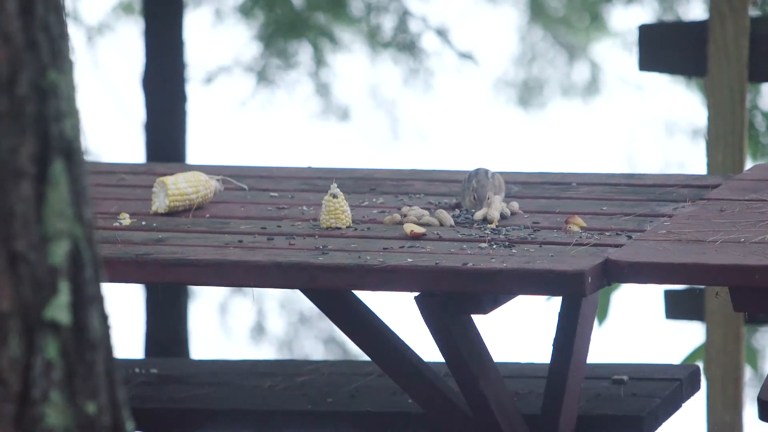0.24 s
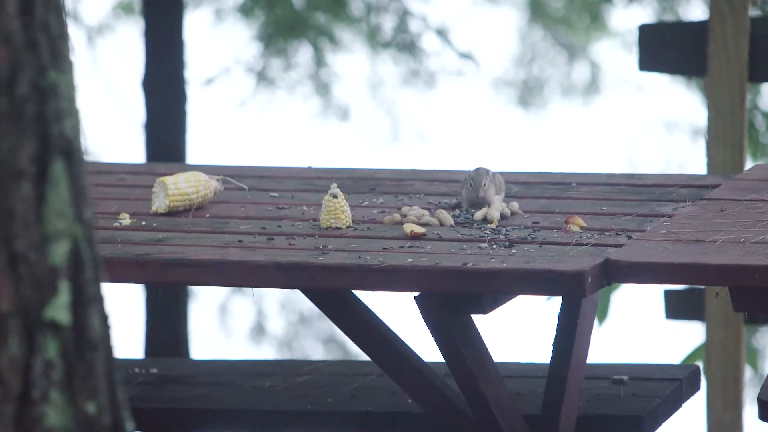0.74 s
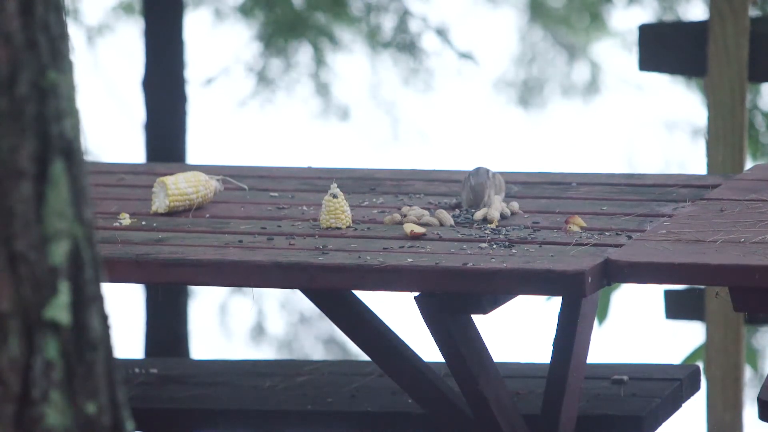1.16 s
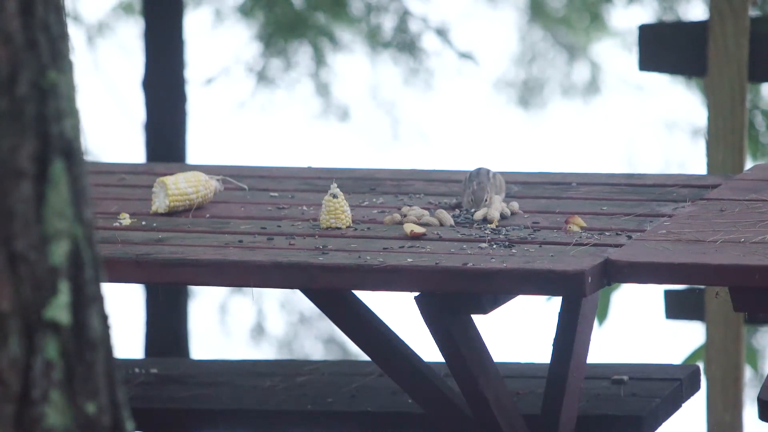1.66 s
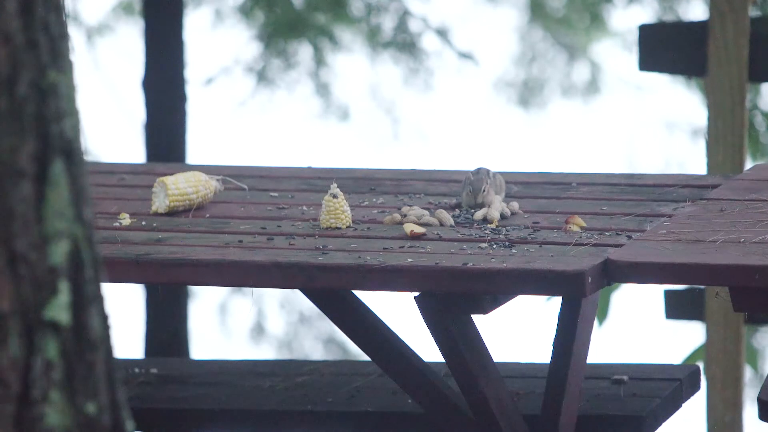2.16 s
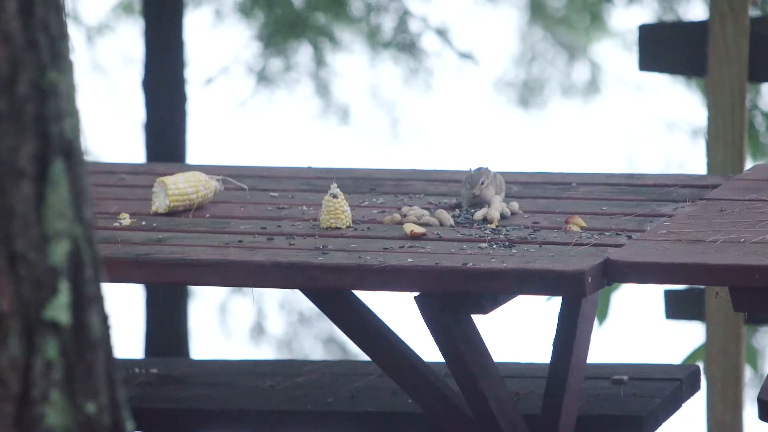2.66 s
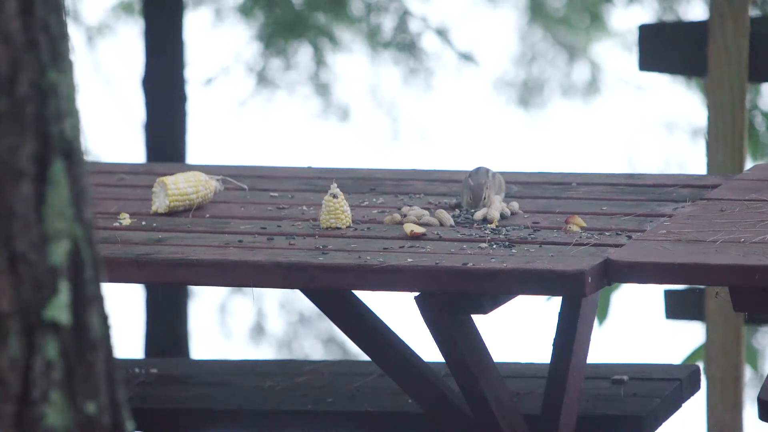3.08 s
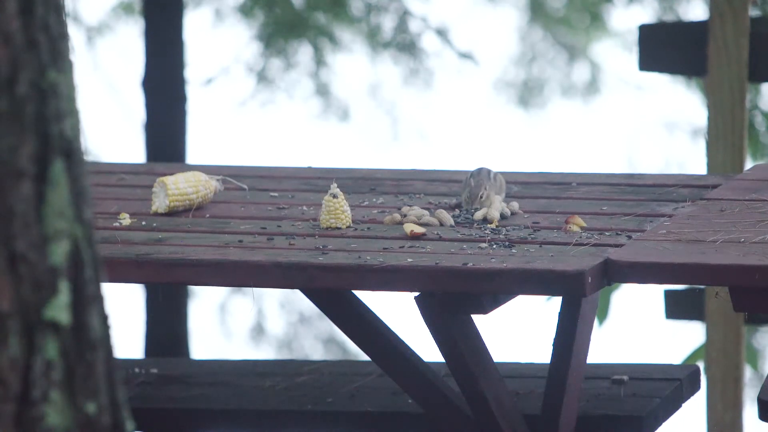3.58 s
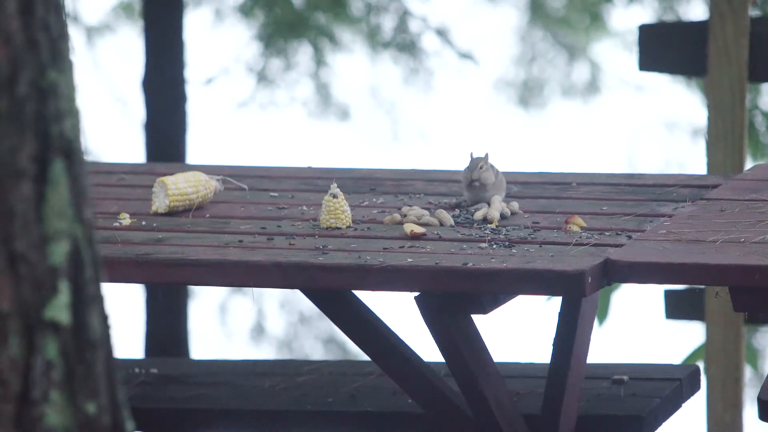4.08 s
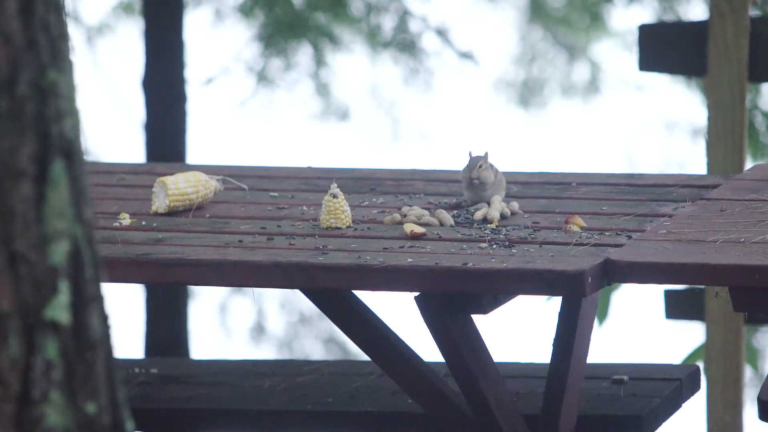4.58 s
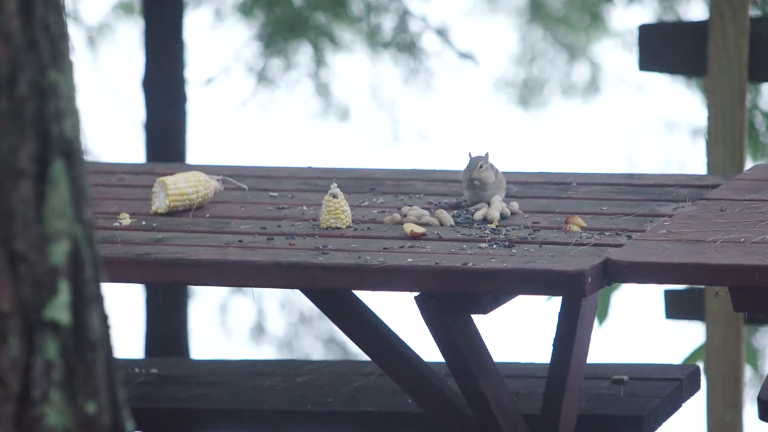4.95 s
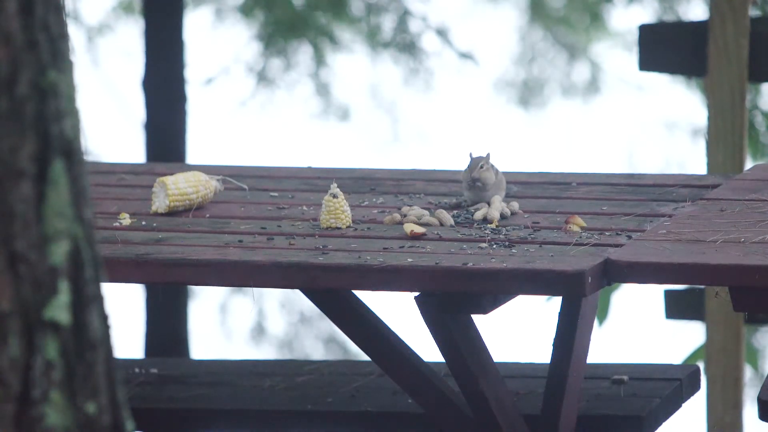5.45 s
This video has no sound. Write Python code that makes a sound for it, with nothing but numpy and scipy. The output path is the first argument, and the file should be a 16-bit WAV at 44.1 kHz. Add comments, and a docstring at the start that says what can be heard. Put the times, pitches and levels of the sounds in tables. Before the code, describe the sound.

A chipmunk gives short, sharp, high chips at an uneven pace outdoors, with low wind bumps, small wooden drips and soft hiss.

```python
"""A chipmunk chips unevenly among trees around a picnic table, from the start almost to the end; each chip
is a quick whistled arch with an echo tail. Early on, husk ticks, drips on wood and faint far calls join in.
A small bird scolds near 1.2, 2.8 and 4.3 s, each time with a whistle and then a rasp of chopped noise.
Gusts of shaped noise come and go over a light breeze, strongest near 3 s; a soft hiss runs throughout.
Late on comes a run of faint rising bird notes, and the last ticks and drips close the scene."""
import sys
import numpy as np
from scipy import signal
from scipy.fft import rfft, irfft
from scipy.io import wavfile
from scipy.ndimage import uniform_filter1d

SR = 44100
rng = np.random.default_rng(int(sys.argv[2]) if len(sys.argv) > 2 else 0)


def dump_mix(stems):
    """Bounce the given channels to the path in sys.argv[1] as a 16-bit WAV at rate SR."""
    frames = np.atleast_2d(stems).T  # one column per channel
    limited = np.clip(frames, -1, 1)  # hard clip at full scale
    pcm = np.round(limited * 32767).astype(np.int16)
    wavfile.write(sys.argv[1], SR, pcm)


N = 252252  # length of the scene in samples

# Levels in the event tables are those before scene() mixes the layers.
# Left-right values above zero make the left side louder.

# The chipmunk's chips: (time [s], length [s], top pitch [Hz], rise time [s], level [dB], left-right [dB],
# voice breaks to a lower note [yes/no])
CHIP_CALLS = [(.117, 0.018, 6770, 0.0027, -50, 14, True), (0.522, 0.049, 6310, .0024, -47, 3, False),
              (.744, 0.039, 6310, .0025, -42, 15, False), (1.396, 0.03, 6090, 0.0019, -55, 0, False),
              (1.692, 0.058, 6308, 0.00383, -48, -1, False), (1.955, .06, 6520, .0095, -47.3, -5, False),
              (2.244, .047, 6120, .0095, -52, 6, False), (2.527, .036, 6340, 0.0039, -48.5, 16, False),
              (2.788, 0.028, 6349, 0.00348, -46, 1.5, False), (2.966, 0.037, 6710, 0.0041, -47.5, 3, False),
              (3.158, 0.0206, 6740, .0025, -50.5, 5, True), (3.359, .036, 6990, .0044, -53, 3, True),
              (3.577, .054, 6780, .0045, -51.5, 5, False), (3.836, .03, 7025, .004, -45.5, 7, False),
              (4.533, .025, 5990, .0015, -50.5, -8, False), (4.657, 0.056, 6040, 0.00464, -58.5, 2, False),
              (4.886, .059, 6484, .0045, -55, 4, False), (5.268, 0.025, 6842, 0.0042, -47, 13, False),
              (5.539, .027, 6750, .0048, -51, 4, True)]
# The lower note after a break: how much of the chip passes first, and its level above that chip
BREAK_SHARE, BREAK_HZ, BREAK_LENGTH_S, BREAK_RISE_S, BREAK_EXTRA_DB = 0.62, 6180, 0.027, 0.001, 2

# The bird's scolds: (time [s], whistle length [s], top pitch [Hz], whistle level [dB], rasp length [s],
# rasp level [dB], grace note leads [yes/no])
BIRD_SCOLDS = [(1.196, .039, 5094, -46, .046, -44.5, True), (2.786, .033, 4535, -46.5, 0.057, -45, True),
               (4.253, .033, 4767, -47.5, 0.055, -45.5, False)]
# The low grace note, which starts just before the whistle
GRACE_LEAD_S, GRACE_LENGTH_S, GRACE_HZ, GRACE_DB = 0.0046, 0.0134, 3348, -57
RASP_GAP_S = 0.009  # pause between whistle and rasp
# Colour of the rasp with the throat open: (frequency [Hz], relative level [dB per Hz])
OPEN_THROAT = [(600, -12), (1000, 3.5), (1450, 6), (2250, -8), (3050, 4), (3750, -5), (4450, 6.5),
               (5600, -2.5), (6900, -12), (8200, -18), (9100, -10), (10100, -10), (11750, 6), (13200, -11),
               (15800, -15)]
# Colour of the rasp as the throat narrows: (frequency [Hz], relative level [dB per Hz])
NARROW_THROAT = [(600, -25), (1500, -12.5), (2300, -17.5), (2750, 4.5), (3050, 6), (3600, -7.5), (4450, -9),
                 (5500, 6), (6900, -9.5), (8700, -5), (10300, -8.5), (11900, -9), (13200, -19),
                 (15800, -12)]

# Answers from far off: (time [s], length [s], top pitch [Hz], level [dB])
FAR_ANSWERS = [(0.886, .22, 7600, -85), (.925, .04, 5570, -82), (1.136, .032, 5577, -76.5),
               (3.295, .023, 5688, -72.5), (3.5, 0.0325, 5735, -73.5), (4.083, .029, 5700, -76.5),
               (5.104, 0.0273, 5620, -74)]
# Short falling notes of distant birds: (time [s])
FALLING_NOTE_TIMES = [.333, 0.941, 1.158, 3.313, 3.72, 4.74, 5.255]
# A rising note is sung once alone, and later in an even run
LONE_RISE_S, RUN_START_S, RUN_STEP_S = 2.138, 4.765, 0.078

# Drips on wood: (time [s], ring level [dB], pitch [Hz], ring time to fall 60 dB [s],
# splash level over the ring [dB], splash time to fall 60 dB [s], left-right [dB])
WOOD_DRIPS = [(.163, -39, 440, 0.046, -16, .03, -11), (.547, -50.5, 380, 0.06, -11.5, .03, -15.5),
              (1.134, -53, 396, 0.074, -17, .03, -6), (1.284, -51, 437, 0.053, -14.5, .03, 1),
              (2.737, -33, 362.5, 0.12, -21, .015, -16), (3.133, -32, 423, 0.043, -12, 0.0115, -12),
              (3.353, -45.5, 1154, 0.053, 1, 0.095, -9), (5.589, -42, 515, 0.037, -4, 0.061, -7),
              (5.610, -46.5, 670, 0.0404, -10, .04, -7)]
# Ways the wood vibrates: (multiple of the drip's pitch [ratio], level [dB])
WOOD_MODES = [(1.002, 1.5), (1.27, -14), (1.45, -44), (2.3, -31)]
# The sharpest husk ticks: (time [s], peak level [dB], centre frequency [Hz])
HUSK_TICKS = [(.136, -45, 9760), (.171, -46, 2240), (.378, -52, 10040), (2.374, -51, 1950),
              (3.056, -48, 10820), (3.976, -52, 4900), (4.648, -50, 4150), (5.395, -48, 1500),
              (5.404, -52, 4000), (5.575, -46, 2700), (5.603, -46.5, 3200)]
# Fainter ticks get a random time and a random frequency in this range
CRUMB_DB, CRUMB_LOW_HZ, CRUMB_HIGH_HZ = -57, 3500, 10500

# How long the far echo of the trees rings: (frequency [Hz], time to fall 60 dB [s])
TREE_RING = [(300, 0.45), (1500, 0.287), (3000, 0.69), (6000, 0.585), (12000, 0.47)]
# How alike the echo is on both sides: (frequency [Hz], likeness [0-1])
ECHO_LIKENESS = [(300, 1), (3000, 0.82), (5500, 0.87), (6500, 0.47), (9000, 0.2), (15000, 0)]

# Light breeze at the microphone, before wind() raises it: (time [s], level [dB])
BREEZE_LEVEL = [(0.0, -67), (1.26, -57), (1.51, -66), (2.05, -59), (2.23, -50), (2.72, -51), (2.95, -37.5),
                (3.18, -43.5), (3.35, -52.5), (4.46, -75.5), (4.81, -66), (5.72, -62)]
# Gusts on top of the breeze: (time of peak [s], length [s], level [dB], left-right [dB])
WIND_GUSTS = [(0.258, 0.087, -42, 20), (.63, 0.064, -43, 2), (0.739, 0.0564, -30, 19),
              (1.096, 0.086, -31.5, 12), (1.394, 0.092, -39.5, 7), (1.744, .08, -47, 3),
              (2.052, 0.065, -40, 17), (2.423, 0.13, -40, -1), (2.72, 0.042, -36.5, 20),
              (2.791, 0.034, -24.5, 25.5), (3.014, 0.078, -27, 20), (3.169, 0.15, -31, 10),
              (3.352, 0.051, -36, 2), (3.628, 0.17, -45, -2), (5.39, 0.16, -49, 3.5)]
# Colour of the slow eddies: (frequency [Hz], relative level [dB per Hz])
SLOW_EDDY_COLOUR = [(8, -11), (18, -0.5), (30, 5), (46, -1), (65, -13), (100, -20.5), (170, -52),
                    (400, -69)]
# Colour of the finer eddies: (frequency [Hz], relative level [dB per Hz])
FINE_EDDY_COLOUR = [(30, -9), (55, 1.5), (85, -0.5), (130, -12), (190, -34), (400, -65)]
# At this wind level the fine eddies have this level; they gain this many dB per dB of wind
FINE_AT_WIND_DB, FINE_DB, FINE_GROWTH = -27, -47, 1.5

# Colour of the outdoor hiss: (frequency [Hz], relative level [dB per Hz])
HISS_COLOUR = [(18, 0), (30, 0.5), (126, 0), (243, -7.5), (420, -13), (492, -12.5), (606, -13),
               (996, -13.5), (2550, -21.5), (3070, -20), (4540, -24.5), (5590, -24.5), (6210, -26.5),
               (6890, -27.5), (15500, -37)]
# How alike the hiss is on both sides: (frequency [Hz], likeness [0-1])
HISS_LIKENESS = [(60, 0.84), (180, 0.343), (550, 0.41), (1650, 0.451), (4970, 0.6), (15000, 0.035)]
# Which side of the hiss is louder: (frequency [Hz], left-right [dB])
HISS_LEAN = [(60, -3), (180, -3.5), (550, -1.5), (1650, -1), (4970, -1), (15000, -1)]
HISS_DB = -56

# The microphone ports resonate differently in the treble: (frequency [Hz], lead of the left [radians])
PORT_LEAD = [(1000, 0), (5000, 0.57), (5700, 0.9), (6100, 2), (6500, 3), (7100, 2), (7800, 2),
             (10000, -0.6), (12500, 1.66)]
TOP_EDGE_HZ = 15800  # nearly everything above this is removed


def chips():
    """The chipmunk: one whistled arch per chip, with a second, lower one where the voice breaks."""
    notes = [row[:-1] for row in CHIP_CALLS]
    for s, length, _, _, db, pan_db, breaks in CHIP_CALLS:
        if breaks:
            break_s = s + BREAK_SHARE * length
            notes.append((break_s, BREAK_LENGTH_S, BREAK_HZ, BREAK_RISE_S, db + BREAK_EXTRA_DB, pan_db))
    return arches(notes, sag=0.35, fall_s=0.0036, jitter=0.006, octave_db=-16, slope_db=-13.5,
                  flutter_db=2.7, swell_db=2.5, under_db=-19)


def arches(notes, sag, fall_s, jitter, octave_db, slope_db, flutter_db, swell_db=0, under_db=-60,
           usual_s=0.045):
    """Whistles that leap to their pitch, hold it on one swelling push of air, and drop as it ends."""
    out = np.zeros((2, N))
    for s, length, hz, rise_s, db, pan_db in notes:
        t = np.arange(int(length * SR)) / SR
        # slack is large at both ends of the note and small in between
        slack = np.exp(-t / rise_s) + np.exp((t - length) / fall_s)
        # a longer call starts and ends lower
        depth = min(sag * length / usual_s, 0.6)
        pitch = hz * (1 - depth * slack) * (1 + jitter * wander(len(t), 350))
        phase = 2 * np.pi * np.cumsum(pitch) / SR

        # the slopes are weaker than the crest
        push_db = slope_db * slack + swell_db * t / length + flutter_db * wander(len(t), 160)
        push = signal.windows.tukey(len(t), 0.2) * amp(push_db)

        # the octave is a little hoarse, and the throat damps it on the highest notes
        hoarseness = 0.35 * wander(len(t), 1700)
        octave = amp(octave_db) * (1 + slack) * np.sin(2 * phase + hoarseness)
        octave = octave / (1 + (pitch / 6750) ** 24)
        # a faint tone an octave below shows as the voice slackens
        under = amp(under_db) * np.sqrt(slack) * np.sin(phase / 2)

        voice = push * (np.sin(phase) + octave + under)
        add(out, s, amp(db) * evened(voice), pan_db)
    return out


def whistles(rise_share=0.15, grace_rise_s=0.0017, pan_db=-4):
    """The whistled arch that opens each scold, sometimes led by a low grace note."""
    notes = []
    for s, length, hz, db, _, _, graced in BIRD_SCOLDS:
        notes.append((s, length, hz, rise_share * length, db, pan_db))
        if graced:
            notes.append((s - GRACE_LEAD_S, GRACE_LENGTH_S, GRACE_HZ, grace_rise_s, GRACE_DB, 0))
    return arches(notes, sag=0.36, fall_s=0.00322, jitter=0.0082, octave_db=-27, slope_db=-13,
                  flutter_db=3, swell_db=3)


def rasps(flutter_hz=155, pulse_share=0.31, leak=0.64, fade_db=4, low_rise_s=0.0068, narrowing_s=0.028,
          uneven_db=0.5):
    """Uneven slaps of the bird's syrinx (voice organ) chop a hiss, coloured by a throat that narrows."""
    out = np.zeros((2, N))
    low_pass = signal.butter(2, 4000, fs=SR, output="sos")
    for start, whistle_s, _, _, length, db, _ in BIRD_SCOLDS:
        s = start + whistle_s + RASP_GAP_S
        t = np.arange(int(length * SR)) / SR
        # each whole turn is one slap; its puff dies away until the next
        turns = np.cumsum(flutter_hz * (1 + 0.2 * wander(len(t), 170))) / SR
        puff_strength = leak + np.exp(-(turns % 1) / pulse_share)
        puffs = puff_strength * rng.standard_normal(len(t))
        level_db = uneven_db * wander(len(t), 600) - fade_db * t / length
        puffs = puffs * signal.windows.tukey(len(t), 0.34) * amp(level_db)

        openness = np.exp(-(t / narrowing_s) ** 2)
        voice = openness * coloured(puffs, OPEN_THROAT) + (1 - openness) * coloured(puffs, NARROW_THROAT)
        # the low part is held back at first, then swells in
        low = signal.sosfiltfilt(low_pass, voice)
        voice = voice - low * np.exp(-(t / low_rise_s) ** 2)
        add(out, s, amp(db) * voice, pan_db=1.5)
    return out


def answers(rise_s=0.003, pan_db=5):
    """Thin, flatter whistled arches from far off to the left."""
    notes = [(s, length, hz, rise_s, db, pan_db) for s, length, hz, db in FAR_ANSWERS]
    return arches(notes, sag=0.17, fall_s=0.0033, jitter=0.0063, octave_db=-20, slope_db=-15,
                  flutter_db=1.0)


def slurs(count=5):
    """Distant birds: faint pure tones that glide straight down or up."""
    out = np.zeros((2, N))
    rise_times = [LONE_RISE_S, *(RUN_START_S + RUN_STEP_S * np.arange(count))]
    # (length [s], from [Hz], to [Hz], level [dB])
    fall_note = (0.011, 3500, 2700, -72)
    rise_note = (0.022, 3300, 4400, -72.5)
    for times, (length, from_hz, to_hz, db) in (FALLING_NOTE_TIMES, fall_note), (rise_times, rise_note):
        pitch = np.linspace(from_hz, to_hz, int(length * SR))
        tone = np.sin(2 * np.pi * np.cumsum(pitch) / SR)
        note = amp(db) * evened(tone * signal.windows.tukey(len(pitch), 0.6))
        for s in times:
            add(out, s, note)
    return out


def drips():
    """A soft blow makes the wood ring in several fading tones, with a short noise splash on top."""
    out = np.zeros((2, N))
    t = np.arange(SR // 4) / SR
    soft_start = 1 - np.exp(-t / 0.001)
    for s, db, hz, t60, splash_db, splash_t60, pan_db in WOOD_DRIPS:
        ring = np.zeros(len(t))
        for multiple, mode_db in WOOD_MODES:
            ring += amp(mode_db - 60 * t / t60) * np.sin(2 * np.pi * hz * multiple * t)
        add(out, s, amp(db) * ring * soft_start, pan_db)
        splash = snap(1420, t60=splash_t60, octaves=0.44)
        add(out, s, amp(db + splash_db) * splash, pan_db)
    return out


def ticks(count=5):
    """Dry noise snaps of seed husks: a few sharp ones, and faint ones at random."""
    out = np.zeros((2, N))
    crumbs = []
    for when, height in rng.random((count, 2)):
        hz = CRUMB_LOW_HZ * (CRUMB_HIGH_HZ / CRUMB_LOW_HZ) ** height
        crumbs.append((when * N / SR, CRUMB_DB, hz))
    for s, db, hz in HUSK_TICKS + crumbs:
        add(out, s, amp(db) * snap(hz, t60=0.01, octaves=0.4))
    return out


def snap(hz, t60, octaves):
    """A tiny fading burst of noise, filtered to a band around one frequency, with peak 1."""
    t = np.arange(2048) / SR
    edges = np.clip([hz / 2 ** octaves, hz * 2 ** octaves], 50, SR / 2 - 100)
    band = signal.butter(2, edges, "band", fs=SR, output="sos")
    burst = signal.sosfilt(band, rng.standard_normal(len(t)) * amp(-60 * t / t60))
    return burst / abs(burst).max()


def trees(x, near_db, far_db, near_t60=0.34, same_side=0.18):
    """Nearby trunks and boards scatter a quick echo; the wood beyond adds a longer tail."""
    t = np.arange(SR) / SR
    # sparse random reflections, about 4000 a second
    a, b = rfft(rng.standard_normal((2, SR)) * (rng.random((2, SR)) < 4000 / SR))
    taps = irfft(alike_pair(a, b, np.clip(read(ECHO_LIKENESS, np.fft.rfftfreq(SR, 1 / SR)), 0, 1)), SR)

    near = taps * amp(-60 * t / near_t60) * (1 - np.exp(-(t / 0.0057) ** 2))

    # the far tail uses the reflections in reverse order; each frequency fades at its own pace
    hz, at, z = signal.stft(taps[:, ::-1], SR, nperseg=256)
    fade = amp(-60 * at / read(TREE_RING, hz)[:, None])
    far = signal.istft(z * fade, SR, nperseg=256)[1][:, :SR]
    far = far * (1 - np.exp(-t / 0.0262))

    echo = (amp(near_db) * evened(near) + amp(far_db) * evened(far)) / np.sqrt(SR)
    # most of what reaches the trees is the average of both sides
    sent = same_side * x + (1 - same_side) * x.mean(0)
    return x + signal.fftconvolve(sent, echo, axes=1)[:, :N]


def wind(breeze_db=2.0, breeze_pan_db=3, lull_db=2):
    """Gusts swell and die over a breeze; their slow eddies push on each microphone port separately."""
    t = np.arange(N) / SR
    breeze_level = np.interp(t, *np.transpose(BREEZE_LEVEL))
    breeze = amp(breeze_db + breeze_level + lull_db * wander(N, 7.2))
    power = (sides(breeze_pan_db) * breeze) ** 2
    for s, length, db, pan_db in WIND_GUSTS:
        swell = np.exp(-(2 * (t - s) / length) ** 2)
        power = power + (amp(db) * sides(pan_db)) ** 2 * swell
    force = np.sqrt(power)

    slow = coloured(rng.standard_normal((2, N)), SLOW_EDDY_COLOUR)
    # even out the noise's own swings, so that the force sets the level
    slow = slow / np.sqrt(uniform_filter1d(slow ** 2, size=3000, axis=1) + 0.019)
    # finer eddies grow faster than the wind does
    fine = coloured(rng.standard_normal((2, N)), FINE_EDDY_COLOUR)
    fine_force = amp(FINE_DB) * (force / amp(FINE_AT_WIND_DB)) ** FINE_GROWTH
    return force * slow + fine_force * fine


def air(swell_db=0.5):
    """Far leaves and open air: a soft noise hiss, partly shared by both ears."""
    hz = np.fft.rfftfreq(N, 1 / SR)
    a, b = rfft(rng.standard_normal((2, N)))
    spectrum = alike_pair(a, b, np.clip(read(HISS_LIKENESS, hz), -1, 1))
    lean_db = read(HISS_LEAN, hz) * np.array([[0.5], [-0.5]])
    spectrum = spectrum * amp(read(HISS_COLOUR, hz) + lean_db)
    return amp(HISS_DB + swell_db * wander(N, 3.9)) * evened(irfft(spectrum, N))


def alike_pair(a, b, likeness):
    """Makes a left and a right spectrum from two random ones, as alike as asked at each frequency."""
    return np.array([a, likeness * a + np.sqrt(1 - likeness ** 2) * b])


def amp(db):
    """Turns decibels into a gain."""
    return 10 ** (np.asarray(db) / 20)


def evened(x):
    """Scales a signal to rms (average strength) 1."""
    return x / np.sqrt(np.mean(x ** 2) + 1e-20)


def sides(pan_db):
    """Left and right gains that differ by pan_db, with rms 1."""
    return evened(amp([[pan_db / 2], [-pan_db / 2]]))


def add(mix, s, sound, pan_db=0):
    """Puts a sound into a stereo mix at s seconds, leaning left or right."""
    part = mix[:, max(round(s * SR), 0):][:, :len(sound)]
    part += sides(pan_db) * sound[:part.shape[1]]


def read(points, hz):
    """Reads a table between its points, on a log-frequency axis."""
    f, value = np.transpose(points)
    return np.interp(np.log(hz + 1), np.log(f + 1), value)


def coloured(x, points):
    """Filters a signal by a table of levels over frequency, then scales it to rms 1."""
    size = x.shape[-1]
    gain = amp(read(points, np.fft.rfftfreq(size, 1 / SR)))
    return evened(irfft(rfft(x) * gain, size))


def wander(size, hz):
    """A smooth random curve of rms about 1, with little movement faster than hz."""
    f = np.fft.rfftfreq(size + SR, 1 / SR)
    noise = rfft(rng.standard_normal(size + SR))
    return evened(irfft(noise * np.exp(-(f / hz) ** 2)))[:size]


def scene():
    """Mixes the callers and small knocks among the trees with the wind and hiss."""
    calls = amp(-4.0) * trees(chips(), near_db=2.5, far_db=-6.5, near_t60=0.16)
    calls += amp(1.0) * trees(whistles(), near_db=-4.5, far_db=-12, near_t60=0.22)
    calls += amp(-1.0) * trees(rasps(), near_db=2, far_db=-7.5, near_t60=0.21)
    calls += amp(4.5) * trees(answers(), near_db=2.5, far_db=-4)
    calls += amp(3.0) * trees(slurs(), near_db=-9, far_db=-8)
    knocks = trees(drips(), near_db=-6.5, far_db=-14.5, near_t60=0.24)
    knocks += amp(2.5) * trees(ticks(), near_db=0.0, far_db=-9, near_t60=0.087)
    return calls + knocks + wind() + air()


def record(dry):
    """Two small microphone ports shift the treble against each other; then a low-pass trims the top."""
    lead = read(PORT_LEAD, np.fft.rfftfreq(N, 1 / SR)) * np.array([[0.5], [-0.5]])
    heard = irfft(rfft(dry) * np.exp(1j * lead), N)
    low_pass = signal.firwin(511, TOP_EDGE_HZ, window=("kaiser", 9), fs=SR)
    return signal.oaconvolve(heard, low_pass[None], "same")


dry = scene()
out = record(dry)
dump_mix(out)
```